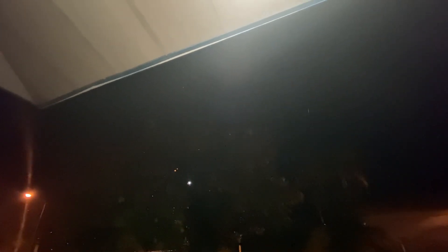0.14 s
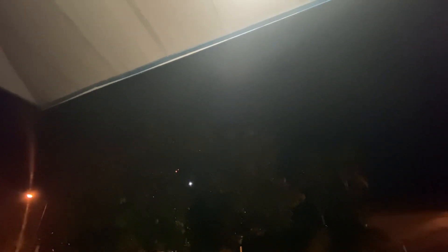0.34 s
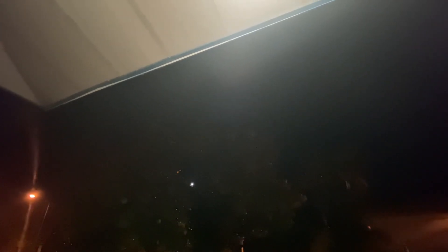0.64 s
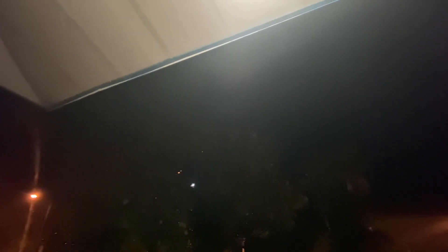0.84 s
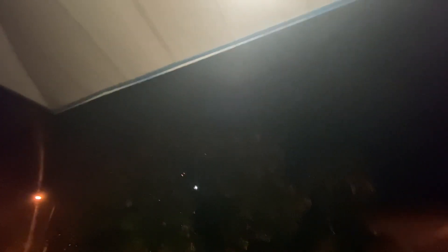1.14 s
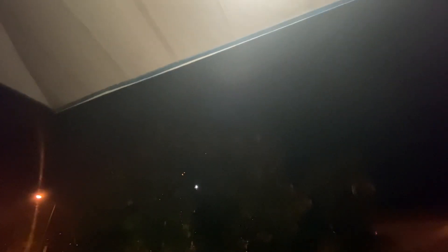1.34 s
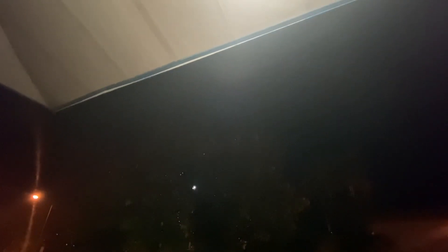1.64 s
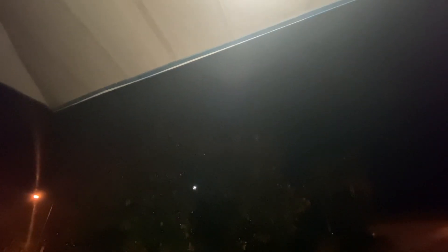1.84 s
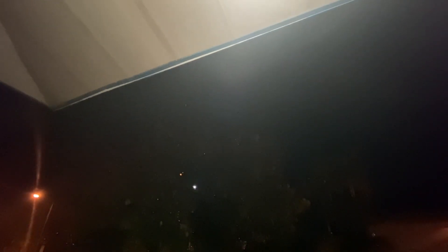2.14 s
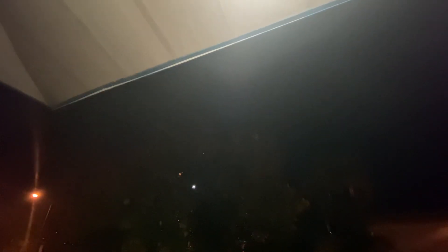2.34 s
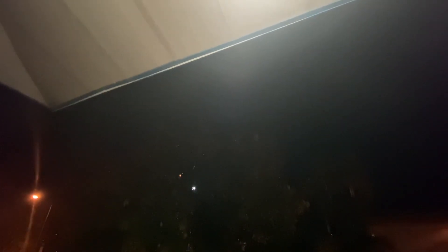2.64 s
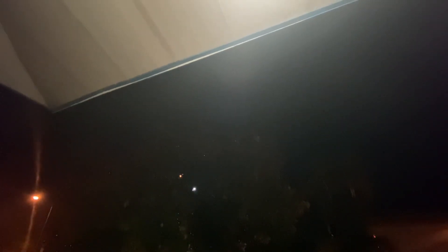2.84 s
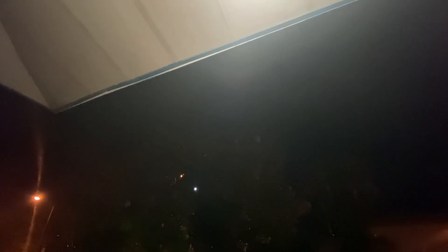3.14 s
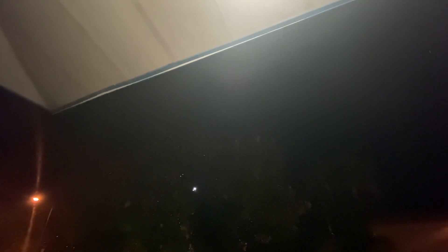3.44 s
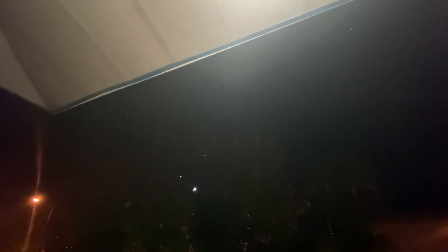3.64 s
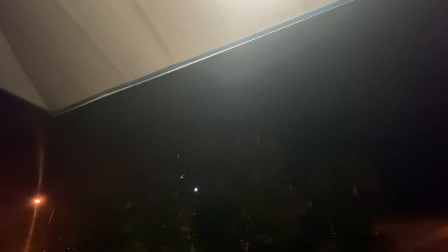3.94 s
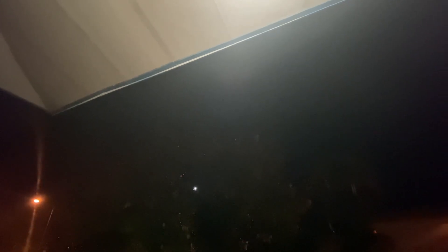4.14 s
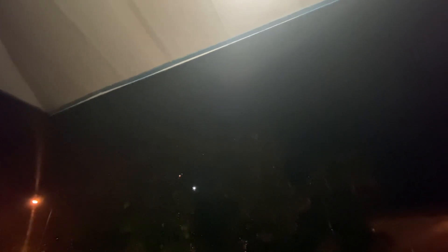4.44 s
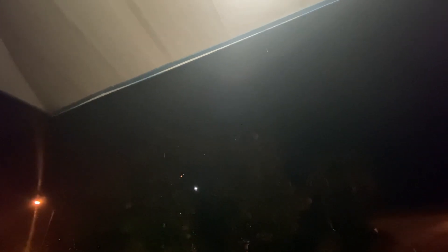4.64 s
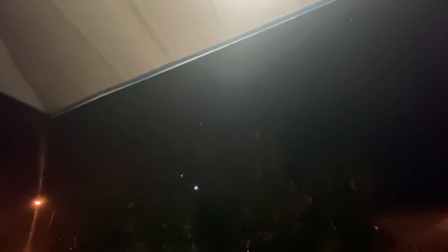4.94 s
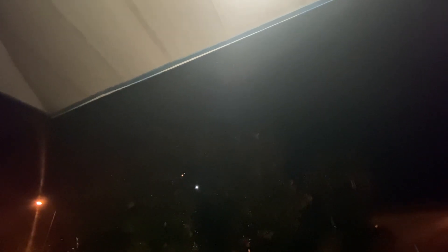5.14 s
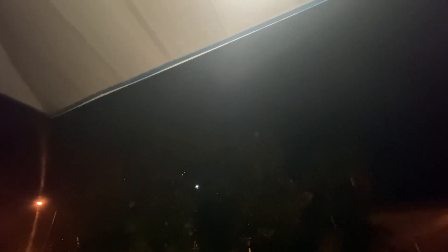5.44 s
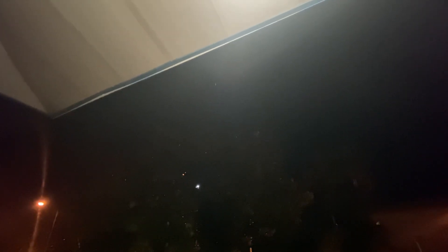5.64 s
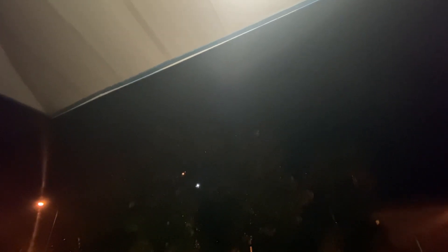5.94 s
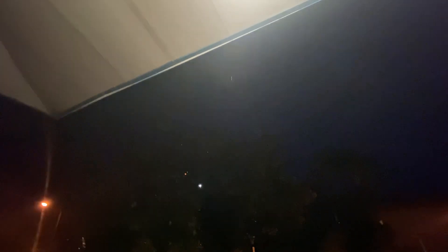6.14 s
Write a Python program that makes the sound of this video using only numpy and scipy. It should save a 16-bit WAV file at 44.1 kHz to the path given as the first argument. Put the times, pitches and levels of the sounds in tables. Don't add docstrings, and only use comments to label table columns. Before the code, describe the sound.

Heavy night rain hisses steadily under a porch roof, with sharp eave drips, puddle plops and low thunder rolling and knocking from the middle onward.

```python
import sys
import numpy as np
from scipy import signal
from scipy.fft import rfft, irfft
from scipy.io import wavfile
from scipy.ndimage import uniform_filter1d

SR = 44100
rng = np.random.default_rng(int(sys.argv[2]) if len(sys.argv) > 2 else 0)


def waveform_to_disk(signal):
    frames = np.transpose(np.atleast_2d(signal))
    scaled = np.clip(frames, -1, 1) * 32767
    samples = np.round(scaled).astype(np.int16)
    wavfile.write(sys.argv[1], SR, samples)


def elevation(decibels):
    levels = np.asarray(decibels, float)
    return 10 ** (levels / 20)


N = 277830

# centre_hz [Hz], density_db [dB per Hz]
RAIN_COLOUR = [(150, 5), (300, -3), (600, 4), (1100, 2.5), (1800, -2.5), (2800, -6.5), (4200, -7),
               (6000, -11.5), (7500, -16.5), (10000, -13.5), (12000, -30), (16000, -34)]
LEFT_LAG = 17
ECHO_S, ECHO_DB = 0.0098, -9


def rms_one(x):
    return x / np.sqrt(np.mean(x ** 2) + 1e-20)


def in_time(rows):
    s, *columns = np.transpose(rows)
    return [np.interp(np.arange(N) / SR, s, c) for c in columns]


def at_hz(points, hz):
    centre_hz, level_db = np.transpose(points)
    return np.interp(np.log(hz), np.log(centre_hz), level_db)


def band(x, low_hz, high_hz):
    edges_hz = [low_hz, min(high_hz, 0.45 * SR)]
    return signal.sosfilt(signal.butter(2, edges_hz, "band", fs=SR, output="sos"), x)


def drift(rate_hz):
    r = np.exp(-80 * np.pi * rate_hz / SR)
    slow = signal.lfilter([1], [1, -2 * r, r * r], rng.standard_normal(N // 40 + 2002))
    slow = rms_one(slow[2000:])
    return np.interp(np.arange(N) / 40, np.arange(len(slow)), slow)


def late_left(left, right):
    return np.array([np.roll(left, LEFT_LAG), right])


def side_gain(pan_db):
    return elevation(np.array([[0.5], [-0.5]]) * pan_db)


def pair(shared, own, alike):
    alike = np.clip(alike, 0, 1)
    return np.sqrt(alike) * late_left(shared, shared) + np.sqrt(1 - alike) * own


def impacts(per_s, spread_db, size):
    strength = elevation(spread_db * np.minimum(rng.exponential(1, size), 5))
    strength = strength * rng.choice([-1, 1], size)
    return rms_one(strength * (rng.random(size) < per_s / SR))


def ring(clicks, hz, t60):
    r, w = elevation(-60 / (t60 * SR)), 2 * np.pi * hz / SR
    return signal.lfilter([0, np.sin(w)], [1, -2 * r * np.cos(w), r * r], clicks + 1e-18)


def swell(s, rise_s, fall_s):
    t, out, i = np.arange(2 * SR) / SR, np.zeros(N + 2 * SR), round(s * SR)
    fall = np.exp(-(t / np.clip(fall_s, 0.02, 0.4) / 1.77) ** 2)
    shape = (1 - np.exp(-(t / rise_s) ** 2)) * fall
    out[i:i + 2 * SR] = shape / shape.max()
    return out[:N]


def add(out, s, sound, pan_db):
    i = round(s * SR)
    out[:, i:i + sound.shape[1]] += (sound * side_gain(pan_db))[:, :N - i]


def rain():
    # start_s [s], level_db [dB]
    downpour = [(0.0, -42.5), (0.45, -44), (0.8, -43.5), (1.2, -42.5), (1.55, -43), (1.95, -42), (2.6, -43),
                (3.16, -42), (3.5, -44), (3.95, -40.5), (4.2, -42.5), (4.55, -40), (4.72, -42.5),
                (4.85, -42), (5.16, -43), (5.5, -41.5), (5.8, -43), (6.3, -42.5)]
    # centre_hz [Hz], alike [0-1]
    likeness = [(200, 0.34), (700, 0.22), (2000, 0.17), (3500, 0.01), (8000, 0.15), (11000, 0)]
    hiss_db, top_flutter = -3.5, 0.6
    body_db, = in_time(downpour)
    far = rng.standard_normal((2, 3, N))
    near = impacts(300, spread_db=2.0, size=(3, N))
    gust, splash = drift(7.8), drift(21)
    edges_hz = 150 * 2 ** np.arange(0, 6.9, 2 / 5)
    low, high = 0, 0
    for k, (low_hz, high_hz) in enumerate(zip(edges_hz, edges_hz[1:])):
        hz = np.sqrt(low_hz * high_hz)
        bright = 1 / (1 + (2200 / hz) ** 2)
        share = np.clip(0.08 + 0.05 * bright, 0, 1)
        drops = np.sqrt(1 - share) * far[k % 2] + np.sqrt(share) * near
        shared, *own = band(drops, low_hz, high_hz)
        flicker_db = 0.5 * gust + (0.45 + 0.5 * bright) * splash
        flicker_db = flicker_db + (1.27 + top_flutter * (hz / 12000) ** 3) * drift(13.7)
        level = elevation(at_hz(RAIN_COLOUR, hz) + flicker_db)
        layer = level * pair(shared, np.array(own), at_hz(likeness, hz))
        low = low + (1 - bright) * layer
        high = high + bright * layer
    return elevation(body_db + 13.5) * (low + elevation(hiss_db + 4.0) * high)


def patter():
    pitches_hz = np.geomspace(800, 6000, 22)
    drops = impacts(500 * elevation(4.0 * drift(6)), spread_db=2.5, size=N)
    dealt = rng.integers(0, len(pitches_hz), N)
    sides = late_left(drops, drops) * elevation(np.array([[1], [-1]]) * rng.normal(0, 1.0, N))
    dealt = late_left(dealt, dealt)
    out = 0
    for k, hz in enumerate(pitches_hz):
        t60 = 0.03 + 45 / hz
        out = out + ring(sides * (dealt == k), hz, t60) * elevation(at_hz(RAIN_COLOUR, hz) * 0.5)
    return elevation(-44.5) * rms_one(out)


def trickle():
    # start_s [s], peak_db [dB]
    surge_table = [
        (1.15, -41),
        (1.29, -58),
        (2.4, -43),
        (5.5, -54),
        (6.149, -46),
    ]
    hits = impacts(700, spread_db=-1.0, size=(2, N))
    flow = elevation(-62)
    for s, peak_db in surge_table:
        flow = flow + elevation(peak_db) * swell(s, rise_s=0.022, fall_s=0.074)
    return flow * 0.5 * rms_one(ring(hits, hz=2632, t60=0.06))


def thunder():
    # start_s [s], level_db [dB], bright_db [dB], difference_minus_sum_db [dB]
    roll_table = [(0.0, -48.5, -11, -9), (0.8, -47.5, -4.5, -8), (1.5, -52.5, -13.5, -7),
                  (2.15, -44, -2.5, -8), (2.4, -40.5, -6, -7.5), (3.05, -33.5, -0.5, -7.5),
                  (3.35, -42, -8, 0.5), (3.5, -35.5, 0.5, -0.5), (3.75, -30, -4.5, 9), (3.9, -38, -5, -1.5),
                  (4.0, -42, -5, 7), (4.18, -37.5, 10, -5), (4.3, -47.5, -3.5, 4.5), (4.85, -41, 5.5, 1),
                  (5.25, -36.5, 5.5, -3), (5.85, -35, 8, -1.5), (6.1, -36.5, 8, -1), (6.3, -40.5, 11, -4)]
    # low_hz [Hz], high_hz [Hz]
    roll_hz = [
        (46, 97.3),
        (92, 165.3),
        (165, 239),
    ]
    # start_s [s], peak_db [dB], fall_s [s], pan_db [left-right dB]
    boom_table = [(0.066, -41, 0.06, -5), (0.423, -30.5, 0.032, -1.5), (0.593, -33, 0.08, -4),
                  (1.22, -33, 0.063, -1), (1.369, -36, 0.023, -6), (1.551, -40, 0.046, -1.5),
                  (1.705, -36, 0.038, -2), (1.928, -29.5, 0.072, -2.0), (2.038, -38, 0.11, -9),
                  (2.27, -39, 0.028, -5), (2.428, -40, 0.097, -2), (2.6, -24.5, 0.039, -7),
                  (2.769, -33.5, 0.11, -5), (3.128, -47, 0.06, -4), (3.224, -38, 0.076, -5),
                  (3.415, -20.5, 0.078, 0), (3.483, -42, 0.055, -2), (3.599, -28, 0.04, 17),
                  (3.784, -33.5, 0.078, 13), (4.057, -39, 0.086, 10.0), (4.602, -33, 0.053, 12),
                  (4.777, -32, 0.042, 3), (5.589, -38, 0.18, 7), (5.915, -28.5, 0.093, 13),
                  (6.068, -43, 0.099, 6)]
    carry_table_db = (-6.5, -33, -47)
    level_db, bright_db, spread_db = in_time(roll_table)
    booms = 0
    for s, peak_db, fall_s, pan_db in boom_table:
        booms = booms + elevation(peak_db) * side_gain(pan_db) * swell(s, 0.0075, fall_s)
    levels_db = level_db - bright_db, level_db, level_db - 14.5 + bright_db
    fronts = impacts(250, spread_db=2.5, size=(2, N))
    out = 0
    for (low_hz, high_hz), roll_db, carry_db in zip(roll_hz, levels_db, carry_table_db):
        roll = band(fronts, low_hz, high_hz)
        even = uniform_filter1d(roll ** 2, size=round(3 * SR / low_hz)) ** 0.3
        common, apart = rms_one(roll / (even + 1e-9))
        sides = common + elevation(spread_db) * apart * [[1], [-1]]
        out = out + (elevation(roll_db) + elevation(carry_db) * booms) * sides
    return signal.sosfilt(signal.butter(3, 50, "high", fs=SR, output="sos"), out)


def droplets(table, cycles, level_db):
    out, t = np.zeros((2, N)), np.arange(900) / SR
    for s, peak_db, hz, pan_db in table:
        tap = np.sin(2 * np.pi * hz * t) * elevation(-60 * hz * t / cycles) * (t < 0.008)
        tap = np.roll(tap, 30) + elevation(ECHO_DB) * np.roll(tap, round(ECHO_S * SR))
        add(out, s, elevation(peak_db + level_db) * late_left(tap, tap), pan_db)
    return out


def taps():
    # start_s [s], peak_db [dB], centre_hz [Hz], pan_db [left-right dB]
    tap_table = [(0.0994, -35, 2790, 4.0), (0.3386, -28, 2100, 4.0), (0.6594, -36, 2240, 2.5),
                 (0.8994, -36, 2440, 3.5), (1.4494, -35, 2220, 2.5), (1.5894, -33, 3010, 4.5),
                 (1.678, -28, 2420, 3.5), (1.9315, -24, 3250, 5), (2.0552, -27, 3470, 4),
                 (2.1116, -31, 2590, 4.5), (2.4902, -31, 2650, 4.5), (2.6594, -35, 2370, 2.5),
                 (3.2994, -34, 2490, 2.0), (3.8494, -28, 4970, 3.0), (3.9194, -31, 2540, 5.0),
                 (4.1044, -25, 3370, 10), (4.3435, -34, 2600, 6.0), (4.405, -34, 2560, 4.0),
                 (4.4624, -28, 2920, 4.5), (4.5264, -29, 2070, 4.0), (4.6054, -25, 2930, 3.5),
                 (4.6194, -30, 2090, 3.5), (4.6704, -25, 6030, 6.5), (4.8994, -34, 2730, 4.0),
                 (5.0494, -33, 2570, 3.5), (5.1694, -31, 2040, 4.0), (5.3208, -30, 2200, 3.0),
                 (5.7428, -30, 4170, 3.5), (5.8994, -36, 2400, 3.5), (6.1085, -31, 2540, 3.5)]
    pinprick_table = [(0.2932, -41, 7710, -1.0), (0.5801, -37, 8640, -1.0), (0.6155, -43, 8050, -1.0),
                      (0.7647, -34, 9220, -1.5), (1.0286, -37, 9450, -0.5), (2.164, -38, 8760, 0.5),
                      (2.4299, -39, 7600, -2.0), (2.4438, -28, 8050, -1.5), (2.7871, -35, 8110, -3.0),
                      (3.0385, -36, 7540, -1.0), (3.1333, -34, 8050, -1.0), (3.3837, -39, 9750, -1.0),
                      (3.5009, -29, 8200, -0.5), (3.5324, -33, 8130, 0.5), (3.8432, -37, 9680, -0.5)]
    click_table = [(0.3386, -30, 2100, 4.0), (0.4509, -29, 2000, 3.0), (0.7637, -33, 4610, 3.5),
                   (1.9315, -29, 3250, 3.5), (2.3705, -30, 2980, 3.0), (2.4902, -31, 2650, 4.5),
                   (2.5544, -30, 3120, 3.5), (3.1782, -28, 5410, 5.0), (3.5329, -16, 5010, 5.5),
                   (3.5424, -24, 4990, 6.0), (3.8424, -30, 5030, 4.0), (3.9194, -31, 2540, 5.0),
                   (3.9494, -31, 2780, 4.5), (4.153, -23, 2000, 4.0), (4.4243, -29, 4600, 4.5),
                   (4.6054, -29, 2920, 4.0), (5.3208, -30, 2200, 3.0), (6.0437, -29, 2990, 5.0)]
    snap_table = [(0.7647, -35, 12000, 0), (1.8267, -41, 13000, 0), (2.456, -31, 8000, -1),
                  (2.469, -33, 9500, -1), (2.7876, -31, 11000, -2.5), (3.038, -44, 12500, 0),
                  (3.9953, -42, 13000, 0), (4.9776, -46, 13000, 0), (5.3228, -44, 13000, 0)]
    out = droplets(tap_table, cycles=16.0, level_db=-3.5)
    out = out + droplets(pinprick_table, cycles=4.0, level_db=5)
    out = out + droplets(click_table, cycles=6.0, level_db=0.5)
    return out + droplets(snap_table, cycles=6.0, level_db=8)


def crack(hz, top_db, size):
    t = np.arange(size) / SR
    hit = (rng.standard_normal((2, size)) * 0.6 + 3.0 * (t == 0)) * np.exp(-t / 0.0008)
    body = 1.1 * band(hit, 0.5 * hz, 1.19 * hz)
    edge = band(hit, max(2200, 0.93 * hz - 1900), 1.35 * hz)
    hit = body + edge + elevation(top_db) * band(hit, 3500, 13000)
    hit = np.roll(band(hit, 2600, 12000), 45, axis=1)
    return late_left(hit[0], hit[1]) / np.abs(hit).max()


def drips():
    # start_s [s], peak_db [dB], centre_hz [Hz], splash_db [dB], pan_db [left-right dB]
    drip_table = [(0.2297, -35, 2500, -2, -1), (0.2934, -22.5, 3100, -21, 1), (0.3367, -33, 2050, 1, 0),
                  (0.4513, -33, 2050, -2, -1), (0.5525, -29.5, 2900, -11, 2),
                  (1.0299, -15.5, 4450, -13.5, 1), (1.3288, -21, 3280, -18, -2),
                  (1.8175, -27.5, 2900, -10.5, 1), (2.3067, -27.5, 2570, -13, -2),
                  (2.4304, -29, 2540, -6, -1), (2.9103, -36, 2610, -6, -4), (2.9198, -29, 4400, -9, 3),
                  (2.955, -26.5, 2370, -7, 0), (3.0072, -27, 2290, -6, -1), (3.2102, -27.5, 2980, -15, 0),
                  (3.5009, -21.5, 3300, -20, 5), (3.533, -17, 4700, -14, 1.5), (4.3565, -32, 2590, -14, 5),
                  (4.4243, -28, 4300, -18, 1), (4.6815, -30, 6200, -14, 7), (5.322, -30, 2210, -6, 5),
                  (5.689, -34, 2060, -7, 6), (6.0435, -31, 2970, -6, 2), (6.152, -36.5, 2120, 4.5, 2)]
    out, t = np.zeros((2, N)), np.arange(6000) / SR
    for s, peak_db, hz, splash_db, pan_db in drip_table:
        decay_s = 0.013 + 0.012 * elevation(peak_db + 18.5)
        spray = impacts(3000, spread_db=2.0, size=(2, len(t)))
        spray = spray * np.exp(-t / decay_s) * (1 - np.exp(-(t / 0.0028) ** 3))
        spray = band(spray, 0.82 * hz, 1.31 * hz) + 0.58 * band(spray, 3000, 4330)
        hit = crack(hz, top_db=-18.5, size=len(t))
        hit = hit + elevation(ECHO_DB) * np.roll(hit, round(ECHO_S * SR), axis=1)
        add(out, s, elevation(peak_db + 4.5) * (hit + elevation(splash_db + 4.5) * spray), pan_db)
    return out


def spatter():
    # start_s [s], peak_db [dB], t60 [s], pan_db [left-right dB]
    spatter_table = [(0.2921, -35, 0.069, 3), (0.5801, -34, 0.037, -2), (0.764, -30.5, 0.12, -2),
                     (1.0296, -44, 0.11, 0), (1.26, -35.5, 0.22, 7), (2.164, -31.5, 0.12, 0),
                     (2.4437, -24.5, 0.14, 0), (2.7871, -36, 0.029, -3), (3.038, -35, 0.034, -2),
                     (3.1336, -31, 0.09, 0), (3.383, -37, 0.12, -6), (3.509, -27, 0.06, 0),
                     (3.5324, -46, 0.21, -4), (3.8435, -37, 0.21, 3), (4.153, -46, 0.049, 4),
                     (4.6708, -35, 0.046, 4)]
    out, t = np.zeros((2, N)), np.arange(5000) / SR
    for s, peak_db, t60, pan_db in spatter_table:
        burst = impacts(5000, spread_db=4.0, size=(2, len(t)))
        burst = burst * elevation(-60 * t / np.clip(t60, 0.02, 0.3))
        burst = band(burst * (1 - np.exp(-t / 0.0014)), 6460, 9800)
        add(out, s, elevation(peak_db + 3.0) * burst / np.abs(burst).max(), pan_db)
    return out


def slaps():
    # start_s [s], peak_db [dB], centre_hz [Hz], length_s [s], pan_db [left-right dB]
    slap_table = [(0.297, -34.5, 880, 0.098, 1.5), (0.518, -34, 885, 0.034, 4),
                  (2.296, -34.5, 330, 0.039, 5), (2.544, -35.5, 396, 0.018, -7),
                  (2.981, -36, 1200, 0.022, -1), (3.473, -32.5, 324, 0.027, -1),
                  (4.122, -34, 468, 0.029, 2), (5.306, -49, 1270, 0.019, -9), (5.533, -33.5, 900, 0.021, 1),
                  (5.548, -27.5, 380, 0.018, -2), (5.785, -34, 466, 0.016, -7),
                  (6.044, -32, 316, 0.033, 1.5), (6.162, -39, 363, 0.042, -7)]
    out, t = np.zeros((2, N)), np.arange(6000) / SR
    for s, peak_db, hz, length_s, pan_db in slap_table:
        burst = impacts(3000, spread_db=3.0, size=(2, len(t)))
        burst = burst * np.exp(-t / length_s) * (1 - np.exp(-t / 0.0026))
        burst = band(burst, 0.55 * hz, 1.78 * hz) + 0.5 * band(burst, 430, 1260)
        add(out, s, elevation(peak_db + 8.5) * burst / np.abs(burst).max(), pan_db)
    return out


def plops():
    # start_s [s], peak_db [dB], pitch_hz [Hz], pan_db [left-right dB]
    plop_table = [(0.297, -38, 813, -1), (0.34, -25, 1420, 10), (0.522, -30, 834, 7.5),
                  (0.575, -30.5, 407, 2), (0.836, -22, 730, 6), (1.147, -26, 1310, 11),
                  (1.528, -39, 1060, -3), (2.302, -34, 550, -3), (2.518, -23, 1240, 5),
                  (2.812, -35, 487, 3), (2.956, -25, 1180, 15), (3.351, -27, 1320, 10),
                  (3.464, -30, 435, -4), (3.499, -37, 415, -3), (3.674, -37, 563, 0), (3.762, -33, 430, -4),
                  (3.876, -37, 470, 2), (4.127, -43, 460, 5), (4.152, -27, 1200, 12), (4.287, -29, 1270, 7),
                  (4.363, -27, 940, -11), (4.779, -35, 564, 5), (4.82, -20.5, 1270, 10.5),
                  (5.322, -33, 1270, 15), (5.607, -24.5, 1140, 16.5), (5.708, -27.5, 430, -4),
                  (5.792, -27.5, 450, 0), (5.84, -29, 564, 3), (6.05, -27, 550, -4), (0.298, -25, 1690, 6),
                  (0.523, -22, 1300, 10), (1.18, -25, 1000, 6), (1.278, -25, 1130, 9), (1.684, -26, 926, 6),
                  (2.304, -24, 1170, 9), (2.747, -27, 816, 4), (2.987, -26, 1990, 0), (3.14, -23, 1300, 11),
                  (3.826, -24, 1310, 10), (3.989, -23, 1080, 8), (4.612, -22, 972, 6),
                  (5.076, -25, 1140, 9), (5.548, -22, 950, 6), (5.554, -22, 1300, 11),
                  (5.693, -24, 1100, 9), (6.05, -23, 1680, 6), (4.66, -27, 330, 2)]
    out, t = np.zeros((2, N)), np.arange(3000) / SR
    for s, peak_db, hz, pan_db in plop_table:
        cycles = hz * t * (1 + 1.8 * t)
        bubble = np.sin(2 * np.pi * cycles) * elevation(-60 * cycles / 30) * (1 - np.exp(-t / 0.00022))
        add(out, s, elevation(peak_db - 5.0) * late_left(bubble, bubble), pan_db)
    return out


def ticks():
    # start_s [s], peak_db [dB], centre_hz [Hz], pan_db [left-right dB]
    tick_table = [(0.7637, -24, 4610, -7), (2.1694, -33, 3080, 0), (2.372, -25, 2960, 0),
                  (2.7194, -35, 2820, 0), (2.8075, -31, 2660, 0), (3.1268, -29, 4300, 8),
                  (3.1782, -27, 5200, 4), (3.8496, -32, 4970, 0), (4.153, -26.5, 2050, 10),
                  (4.4275, -28, 4300, 0), (4.684, -24, 6600, 4), (5.4171, -35, 2650, 0)]
    out = np.zeros((2, N))
    for s, peak_db, hz, pan_db in tick_table:
        add(out, s, elevation(peak_db) * crack(hz, top_db=-14.5, size=600), pan_db)
    return out


def knocks(roll):
    # start_s [s], peak_db [dB], pitch_hz [Hz], cycles [count], pan_db [left-right dB]
    knock_table = [(2.271, -21.5, 75, 3.4, 0), (2.641, -21.5, 67, 2.9, 1), (3.463, -18.5, 118, 4.2, -8),
                   (3.597, -23, 185, 1.6, 19), (3.716, -21, 299, 6.6, -1), (3.673, -12.5, 178, 5.5, -4),
                   (3.711, -16, 98, 4.6, -1), (3.801, -17, 97, 1.9, 7), (3.943, -17, 55.7, 3, 1),
                   (3.944, -15.5, 137, 3.8, -1), (3.47, -16, 195, 4.9, -5), (4.019, -23.5, 188, 4.2, 1),
                   (5.278, -22, 110, 2.3, 0), (5.707, -25.5, 183, 4.5, 1), (5.749, -22, 156, 2.3, -6),
                   (5.842, -24.5, 270, 2.8, -3), (5.915, -19, 93, 2.0, 0), (6.066, -18, 257, 4.4, 8),
                   (5.946, -19, 115, 2.8, 0), (5.98, -24, 128, 2.5, 0), (6.7, -26, 200, 3, 0),
                   (6.036, -22, 144, 2.2, 2), (5.77, -24, 210, 2.5, 0), (5.8, -26, 120, 2.5, 0),
                   (2.045, -23.5, 71, 2.2, 0), (1.56, -26, 75, 2.2, 0), (6.072, -23, 77, 2.1, 3),
                   (6.008, -22, 75, 1.6, 0), (3.69, -24, 335, 5, 0), (2.67, -26, 149, 4.6, 0)]
    out, cover, t = np.zeros((2, N)), np.zeros((2, N)), np.arange(6000) / SR
    for s, peak_db, hz, cycles, pan_db in knock_table:
        length_s = np.clip(cycles, 1, 6) / hz
        envelope = np.sin(np.pi * np.minimum(t / length_s, 1)) ** 2 * np.ones((2, 1))
        wave = np.sin(2 * np.pi * (hz * t + rng.normal(0, 0.091, (2, 1))))
        add(out, s - 0.12 * length_s, elevation(peak_db - 3.0) * envelope * wave, pan_db)
        add(cover, s - 0.033 * length_s, envelope, 0)
    return out + roll * np.clip(1 - 0.65 * cover, 0, 1)


def porch(x):
    # centre_hz [Hz], width_hz [Hz], peak_db [dB]
    mode_table = [(417, 59, 4), (565, 28, 4), (900, 280, -0.5), (1150, 270, -0.5), (2050, 33, 3.5),
                  (2705, 180, 2.5), (2900, 68, 1.5), (4240, 290, -1), (6400, 910, 3.5)]
    hz = np.fft.rfftfreq(N, 1 / SR)
    lift_db = 0
    for centre_hz, width_hz, peak_db in mode_table:
        lift_db = lift_db + peak_db / (1 + (2 * (hz - centre_hz) / width_hz) ** 2)
    return irfft(rfft(x) * elevation(lift_db), N)


def scene():
    water = rain() + patter() + trickle() + taps() + drips() + spatter() + slaps() + plops() + ticks()
    return porch(water) + knocks(thunder())


def low_pass(x):
    return signal.sosfilt(signal.butter(12, 15800, fs=SR, output="sos"), x)


def record(dry):
    # centre_hz [Hz], difference_db [dB]
    port_colour = [(100, 0.5), (250, 3), (700, 1), (1300, 4.5), (2000, -1.5), (3000, 5), (4200, 4.5),
                   (6000, 7.5), (7500, 3), (9000, -3), (12000, -4)]
    # centre_hz [Hz], difference_minus_sum_db [dB]
    port_comb = [(450, -1), (700, 4.5), (950, 0), (9000, 0), (10000, -6), (10900, -8), (11300, 5),
                 (12600, 21), (13200, -17), (14300, -27), (14750, -8), (15200, 14), (16000, 12)]
    hz = np.fft.rfftfreq(N, 1 / SR) + 1
    left, right = rfft(dry) * side_gain(at_hz(port_colour, hz)) * (hz < 15800)
    lean = np.arctan(elevation(at_hz(port_comb, hz)))
    total = (left + right) * np.cos(lean)
    difference = (left - right) * np.sin(lean)
    ports = irfft(np.array([total + difference, total - difference]) / np.sqrt(2), N)
    return low_pass(ports)


dry = scene()
out = record(dry)
waveform_to_disk(out)
```